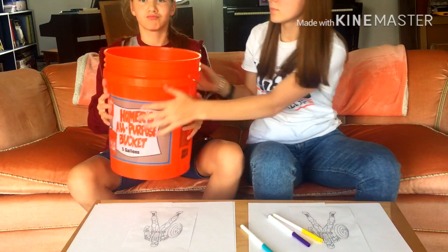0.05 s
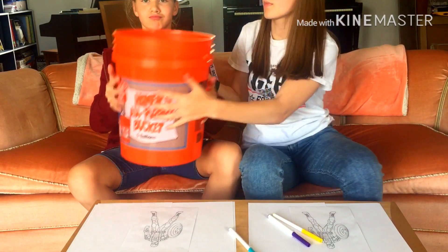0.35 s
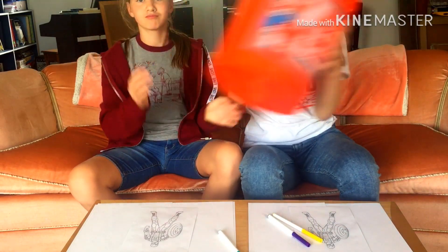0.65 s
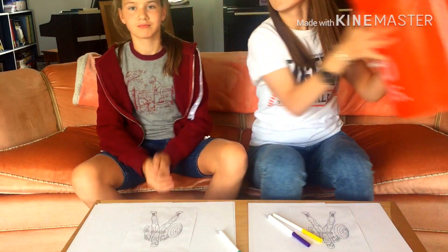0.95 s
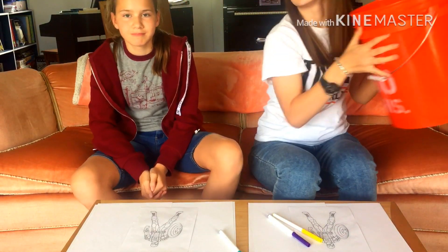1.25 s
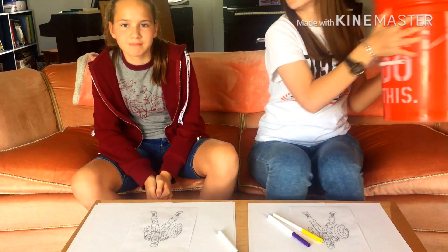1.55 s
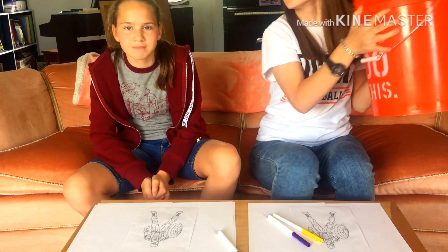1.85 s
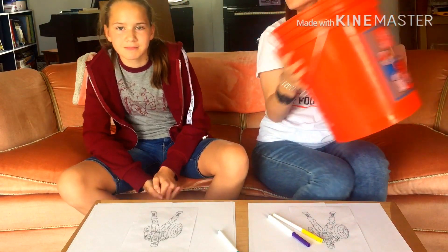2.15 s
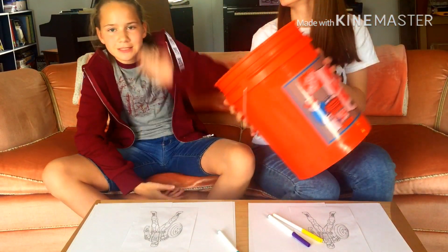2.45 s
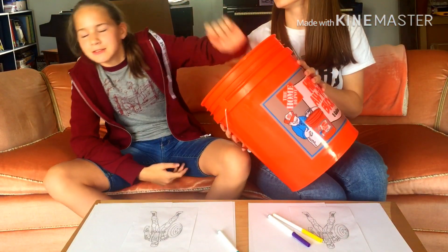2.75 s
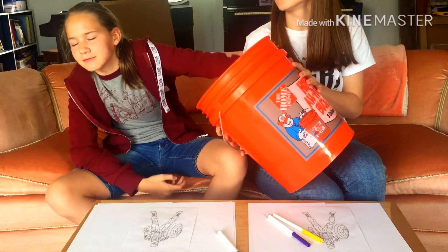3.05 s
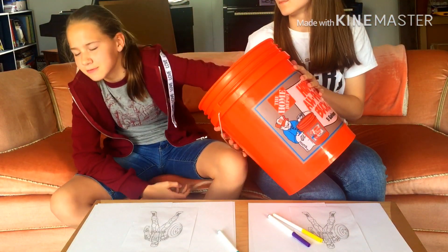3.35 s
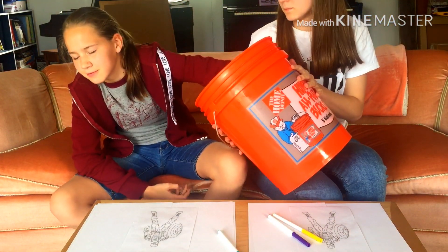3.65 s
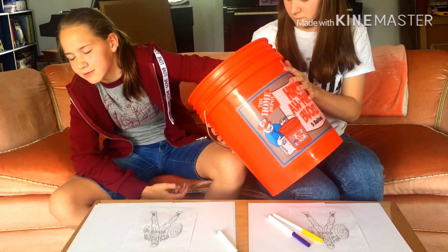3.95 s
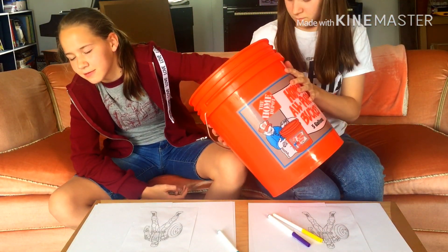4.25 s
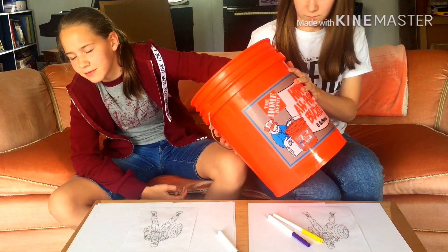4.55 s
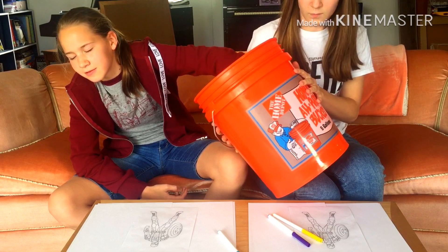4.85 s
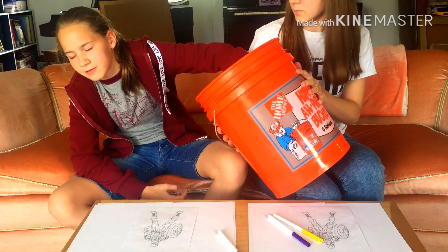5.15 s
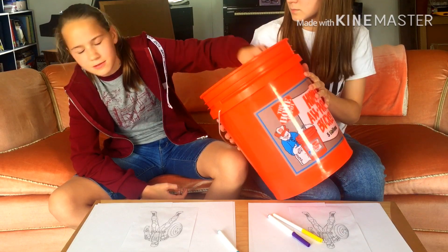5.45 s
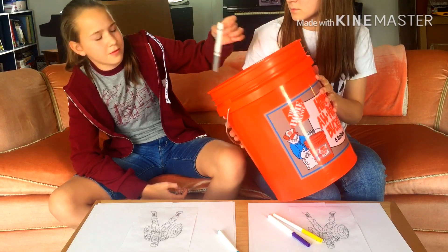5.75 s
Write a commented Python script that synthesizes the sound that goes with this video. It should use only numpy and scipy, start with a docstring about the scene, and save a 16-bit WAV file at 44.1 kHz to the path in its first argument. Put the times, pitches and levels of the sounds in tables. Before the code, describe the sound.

Close to a small microphone in a quiet living room, a big plastic bucket is swung about, sending a heap of markers sliding, rattling and drumming against its bottom. The shaking ends with a soft bump and a brief pause. Then a hand stirs through the markers in short pushes, with lighter shuffling and scattered sharp clacks, each ringing briefly in the hollow bucket.

```python
"""Felt-tip markers tumbling in a big plastic bucket, close to a small microphone in a quiet living room.
The bucket is shaken, handed over and set on a lap, then a hand rummages in it. Each collision is a dry
clack of the barrels; those that reach the bottom make it thump like a slack drum. The shell booms when
jolted, skin hisses over plastic, and the air in the bucket and the room ring on behind."""
import sys
import numpy as np
from scipy import signal
from scipy.fft import rfft, irfft
from scipy.io import wavfile
from scipy.ndimage import uniform_filter1d

SR = 44100
rng = np.random.default_rng(int(sys.argv[2]) if len(sys.argv) > 2 else 0)


def master_out(mix):
    """Clip the mix to full scale and print it as 16-bit PCM to the path in sys.argv[1]."""
    frames = np.transpose(np.atleast_2d(mix))
    ceiling = np.clip(frames, -1, 1)
    pcm = np.round(ceiling * 32767).astype(np.int16)
    wavfile.write(sys.argv[1], SR, pcm)


N = 261072
TIME = np.arange(N) / SR


def gain_of(db):
    """Decibels to amplitude."""
    return 10 ** (np.asarray(db) / 20)


def unit_rms(x):
    """Scales to rms 1."""
    return x / np.sqrt(np.mean(x ** 2) + 1e-20)


def unit_energy(x):
    """Scales each sound to energy 1."""
    return x / np.linalg.norm(x, axis=-1, keepdims=True)


def decay(t, t60):
    """Falls by 60 dB in t60 seconds."""
    return np.exp(-np.log(1000) * t / t60)


def read(points, hz):
    """Reads (frequency [Hz], value) points on a log-frequency axis."""
    f, value = np.transpose(points)
    return np.interp(np.log(hz + 1), np.log(f + 1), value)


def steep(x, hz, side, order=4):
    """Butterworth low-, band- or high-pass."""
    return signal.sosfilt(signal.butter(order, hz, side, fs=SR, output="sos"), x)


def add(mix, s, sound):
    """Mixes a sound in at s seconds."""
    part = mix[max(round(s * SR), 0):][:len(sound)]
    part += sound[:len(part)]


def movement(start_s, build_s, settle_s, db):
    """Gain of one movement: it builds to its peak, then settles to rest."""
    t = TIME - start_s
    ramp = np.minimum(t / build_s, 1 - (t - build_s) / settle_s)
    return gain_of(db) * np.maximum(ramp, 0) ** 1.003


def noise(spectrum):
    """Steady noise of rms 1, coloured by (frequency [Hz], level [dB]) points."""
    colour = gain_of(read(spectrum, np.fft.rfftfreq(N, 1 / SR)))
    return unit_rms(irfft(rfft(rng.standard_normal(N)) * colour, N))


def dying_noise(t60s, count, size):
    """Noise bursts of energy 1, each octave dying at its own speed."""
    hz, centres = np.fft.rfftfreq(size, 1 / SR), np.geomspace(200, 12800, 7)
    white, out = np.exp(2j * np.pi * rng.random((count, len(hz)))), 0
    for centre, share in zip(centres, np.eye(len(centres))):
        t60 = read(t60s, centre)
        band = irfft(white * read(np.c_[centres, share], hz), size)
        out = out + band * decay(TIME[:size], t60) / np.sqrt(t60)
    return unit_energy(out)


def cap_rings(count, size, modes=12):
    """The hollow barrel and its cap ring at high pitches, different for each marker."""
    t, (place, force) = TIME[:size], rng.random((2, count, modes, 1))
    hz = 1200 + 14000 * (np.arange(modes)[:, None] + place) / modes
    rings = force * np.sin(2 * np.pi * hz * t) * decay(t, t60=0.035)
    return unit_energy(rings.sum(axis=1))


# Colour of a clack close up: (frequency [Hz], level [dB])
CLACK_SPECTRUM = [(180, -5.5), (300, 4.5), (366, -1.5), (601, 4.5), (697, 1), (954, 4.5), (1160, 1),
                  (1310, 5), (1850, 0.5), (2110, 1), (3090, -10.5), (4900, -36.5), (5500, -32), (9490, -56),
                  (15600, -67)]
# Decay of a struck barrel: (frequency [Hz], t60 [s])
BARREL_DECAY = [(400, .03), (1500, .022), (4000, .012), (12000, .008)]
# Decay in the hollow of the bucket: (frequency [Hz], t60 [s])
HOLLOW_DECAY = [(200, 0.22), (1000, 0.31), (4000, 0.093), (12000, 0.49)]

def clacks(barrel_hz, bounce_db, cap_db, size=4096):
    """Plastic barrels strike and bounce: a clack per pitch, split into body, sharp edge and fine tick."""
    count, hz, t = len(barrel_hz), abs(np.fft.fftfreq(size, 1 / SR)), TIME[:size]
    octaves_off = np.log2((hz + 1) / barrel_hz[:, None])
    ring_db = 7 * np.exp(-(octaves_off / 0.24) ** 2)
    log_gain = np.log(gain_of(np.maximum(read(CLACK_SPECTRUM, hz) + ring_db, -80)))
    colour = np.fft.ifft(np.exp(np.conj(signal.hilbert(log_gain)))).real[:, :size // 2]  # minimum phase
    contact = dying_noise(BARREL_DECAY, count, size) + gain_of(cap_db) * cap_rings(count, size)
    contact *= 1 - np.exp(-t / 0.00066)
    # one end of a marker lands first, the other a few milliseconds later
    lags = (rng.uniform(0.001, 0.004, count) * SR).astype(int)
    far_ends = dying_noise(BARREL_DECAY, count, size)
    rebound = np.array([np.roll(burst, lag) for burst, lag in zip(far_ends, lags)])
    # every spot in the bucket has its own pattern of bounces between the walls
    bounces = dying_noise(HOLLOW_DECAY, count, size) * (1 - np.exp(-t / 0.0023))
    bursts = contact + gain_of(-3) * rebound + gain_of(bounce_db) * bounces
    bursts = signal.fftconvolve(bursts, colour, axes=1)[:, :size]
    body = steep(bursts, 3500, "low")
    edge = steep(bursts, [4200, 7400], "band")
    tick = steep(bursts, [8400, 15000], "band")
    return unit_energy(np.array([body, edge, tick]))


# Modes of the bucket's bottom: (multiple of its pitch, level [dB], t60 [s])
BOTTOM_MODES = [(.74, -18, 0.2), (1, 19.5, 0.11), (1.28, 6.5, 0.11), (1.95, -39, .03),
                (2.701, -15.5, 0.076)]

def thump(hz, rise_s=0.0013):
    """The struck bottom rings like a slack drum."""
    t = TIME[:5000]
    ring = sum(gain_of(db) * decay(t, t60) * np.sin(2 * np.pi * hz * ratio * t)
               for ratio, db, t60 in BOTTOM_MODES)
    return unit_energy(ring * (1 - np.exp(-t / rise_s)))


def collisions(sounds, per_s, spread_db, window=2200):
    """Random hits of unequal force, one track per band, each held near a steady power of 1."""
    hits = rng.random(N) < per_s / SR
    force = hits * gain_of(spread_db * np.clip(rng.standard_normal(N), -2, 2))
    # a few markers bounce again and again, then others take over
    active, turnover_per_s = 9, 45
    which = (rng.integers(0, active, N) + (TIME * turnover_per_s).astype(int)) % sounds.shape[1]
    out = np.zeros((len(sounds), N))
    for at in np.flatnonzero(force):
        for track, sound in zip(out, sounds[:, which[at]]):
            add(track, at / SR, force[at] * sound)
    power = uniform_filter1d(uniform_filter1d(out ** 2, window), window // 2)
    return out / np.sqrt(abs(power) + 0.0084 * power.mean(axis=1, keepdims=True))


def sliding_heap(slides, per_s, spread_db, bottom_hz, body_db, edge_db, tick_db, drum_db, brightening):
    """The heap clatters, brighter the harder it moves; the heavier hits drum on the bottom."""
    markers = clacks(rng.permutation(np.geomspace(700, 3600, 110)), bounce_db=-3, cap_db=-3)
    body, edge, tick = collisions(markers, per_s, spread_db)
    pitches = rng.permutation(np.geomspace(*bottom_hz, 12))
    thumps = np.array([(-1) ** k * thump(hz) for k, hz in enumerate(pitches)])
    drum, = collisions(thumps[None], per_s=140, spread_db=2, window=1500)
    powers = np.array([movement(*slide) ** 2 for *slide, _ in slides])
    motion = np.sqrt(powers.sum(axis=0))
    drumming = np.sqrt(gain_of([db for *_, db in slides]) ** 2 @ powers)
    treble = (gain_of(edge_db) * edge + gain_of(tick_db) * tick) * (motion / motion.max()) ** brightening
    return motion * (gain_of(body_db) * body + treble) + gain_of(drum_db) * drum * drumming


# Swings of the bucket: (start [s], build-up [s], settling [s], relative level [dB], drum offset [dB])
SWINGS = [(0.0, 0.0069, 0.17, -23, -0.5), (0.085, 0.029, 0.15, -20, -22), (0.14, 0.052, .15, -18, 0),
          (0.24, 0.047, 0.34, -23, -4), (0.59, 0.078, 0.15, -37.5, -4.5), (0.72, 0.07, 0.2, -32.5, -1),
          (0.91, .2, 0.4, -19, 1.5), (1.36, 0.075, 0.27, -28, -3), (1.43, 0.17, .15, -23, 3),
          (1.65, 0.15, .15, -19.5, -17), (1.83, 0.095, 0.36, -22, 0.5), (2.26, 0.13, 0.25, -29, 5.5),
          (2.39, 0.21, 0.17, -24, -6), (2.77, 0.013, 0.12, -40, -9)]

def shaking():
    """Each swing of the bucket sends the heap sliding and rolling."""
    return sliding_heap(SWINGS, per_s=440, spread_db=0.35, bottom_hz=(192.7, 224.5),
                        body_db=-3.5, edge_db=-15.5, tick_db=-25, drum_db=-4, brightening=0.48)


# Standing waves inside the bucket: (frequency [Hz], t60 [s], level at resonance [dB])
AIR_MODES = [(201, 0.68, 0), (484.5, 0.021, -1), (555, 0.3, 2), (972, 0.07, -1.5), (1176, 0.17, -30),
             (1628, 0.028, -8), (2020, 0.13, -11), (3242, 0.004, 4)]

def bucket_air(x):
    """The air in the bucket rings on; the bucket is too small to radiate deep bass."""
    t = TIME[:8000]
    waves = sum(gain_of(db) * 2 * np.log(1000) / (t60 * SR) * decay(t, t60) * np.cos(2 * np.pi * hz * t)
                for hz, t60, db in AIR_MODES)
    return steep(x + signal.oaconvolve(x, waves)[:N], 122, "high", order=6)


# Reverberation of the living room: (frequency [Hz], t60 [s])
ROOM_DECAY = [(200, 0.33), (1000, 0.24), (4000, 0.15), (12000, 0.028)]

def living_room(x, wet_db=-11, delay_s=0.007, moves_per_s=3):
    """A short tail behind the close sound; its pattern shifts as the bucket and the people move."""
    out = x.copy()
    for k, tail in enumerate(dying_noise(ROOM_DECAY, count=3, size=24000)):
        share = np.sqrt(2 / 3) * np.cos(np.pi * (moves_per_s * TIME + k / 3))
        add(out, delay_s, gain_of(wet_db) * signal.oaconvolve(x * share, tail))
    return out


# The still room at the microphone: (frequency [Hz], relative level [dB])
ROOM_TONE_SPECTRUM = [(18, -30.5), (30, -2), (75, -6), (108, -12), (243, -8), (456, -16.5), (533, -21.5),
                      (900, -17), (1140, -20.5), (2030, -19), (4800, -28.5), (6570, -31), (10300, -37),
                      (12000, -34), (15600, -45.5)]

def room_tone():
    """A faint, steady rumble and hiss all around."""
    return gain_of(-60.5) * noise(ROOM_TONE_SPECTRUM)


def blows(rows, bounce_db, body_db, edge_db, tick_db, thump_db):
    """Markers hit the wall, the bottom or each other; a hard contact lifts the finest ticks most."""
    out = np.zeros(N)
    times, clack_db, bright_db, barrel_hz, bottom_db, bottom_hz = np.transpose(rows)
    body, edge, tick = clacks(barrel_hz, bounce_db, cap_db=-5)
    for k, s in enumerate(times):
        treble = gain_of(edge_db + bright_db[k] / 2) * edge[k] + gain_of(tick_db + bright_db[k]) * tick[k]
        add(out, s, gain_of(clack_db[k]) * (gain_of(body_db) * body[k] + treble))
        add(out, s, gain_of(bottom_db[k] + thump_db) * thump(bottom_hz[k]))
    return out


# Bunches landing, levels relative:
# (time [s], clack [dB], brightness [dB], barrel pitch [Hz], thump [dB], bottom pitch [Hz])
CRASHES = [(0.002, -7, 2.5, 970, -27.5, 292), (0.169, -8, -2, 950, -17, 169),
           (0.196, -5, 3, 1190, -9.5, 196), (0.286, -8, -1, 940, -39, 208),
           (0.357, -12, 2.5, 960, -15.5, 205), (1.007, -11, -4, 970, -26, 200),
           (1.125, -5, 2.5, 850, -30, 218), (1.192, -11, 1, 1620, -18.5, 196),
           (1.309, -14.5, 3, 960, -15, 207.4), (1.57, -13, 6.5, 960, -26.5, 255),
           (1.8, -8.5, 8.5, 960, -13, 243), (1.918, -10.5, 1, 1060, -19.5, 239),
           (2.476, -23, 1, 960, -16, 239), (2.594, -14, 6.5, 876, -24.5, 253),
           (3.433, -17, -2, 940, -18, 241), (3.474, -13.5, 0.5, 634, -20, 277),
           (3.521, -22, 6.5, 880, -34, 267), (3.835, -16.5, -15, 2064, -30, 192),
           (3.865, -18.5, 5, 760, -24.5, 155), (4.426, -16, 4.5, 565, -24, 189.8),
           (4.445, -14.5, -7, 975, -18.5, 185), (4.466, -16.5, -6, 560, -21, 189),
           (4.544, -19, -6, 1010, -27.5, 157), (4.69, -15.5, -5, 1360, -26.5, 190),
           (4.75, -15, -10, 1010, -34, 189), (5.254, -20.5, -12, 880, -21, 176),
           (5.42, -27, 1.5, 750, -31.5, 262)]

def crashes():
    """A bunch of markers comes down together; strong bounces smear the clack into a short crash."""
    return blows(CRASHES, bounce_db=5, body_db=17.5, edge_db=-0.5, tick_db=-6.5, thump_db=25.5)


# Single markers landing, levels relative:
# (time [s], clack [dB], brightness [dB], barrel pitch [Hz], thump [dB], bottom pitch [Hz])
SINGLE_KNOCKS = [(0.093, -12.5, 3.5, 1520, -50, 318), (0.272, -15, -8, 993, -31, 203),
                 (0.495, -19, 4, 1960, -57, 200), (0.605, -29, 2, 1440, -53, 197),
                 (0.618, -20.5, -6, 1420, -68, 319.3), (0.813, -22, -3, 870, -49, 201),
                 (0.928, -25.5, 10, 2180, -29.5, 213), (0.969, -20.5, 13.5, 2110, -24.5, 201),
                 (1.041, -14, 13, 945, -19, 222), (1.284, -16.5, 10, 604, -13.5, 189),
                 (1.391, -16.5, -6, 930, -23, 232), (1.66, -9, 7.5, 1980, -24, 207),
                 (2.125, -27, 6, 950, -18, 230), (2.195, -11, 2, 890, -25, 184),
                 (2.341, -17.5, 6, 840, -28, 252), (2.735, -22.5, 6.5, 2730, -75, 181),
                 (2.806, -29.5, 8, 1460, -70, 199), (3.102, -47.5, 4.5, 970, -58, 329),
                 (3.323, -32, -12, 720, -33, 232), (3.358, -28, 5, 610, -28.5, 230),
                 (3.4, -33, -12, 603, -19, 225), (3.646, -24, 4, 964.4, -27, 194),
                 (3.706, -32, 15, 960.5, -17.5, 188), (3.739, -22, -10, 980, -20, 191),
                 (3.938, -25.5, 1, 1570, -36, 151), (4.323, -25, -7, 1910, -62, 284),
                 (4.585, -21, -2, 2320, -41, 199), (4.611, -17.5, -2, 970, -31, 149),
                 (4.666, -12, -1, 576, -31, 190), (4.856, -20, 1, 544, -25.5, 238),
                 (4.969, -24, 6, 960, -33, 205), (4.98, -14.5, 13.5, 1020, -49, 223),
                 (4.998, -12, -6, 950, -43, 256), (5.038, -16, -2, 1470, -54, 210),
                 (5.161, -15, -1.5, 630, -22.5, 199), (5.318, -16, 2.5, 576, -29.5, 158),
                 (5.495, -20, 4, 1020, -16.5, 204), (5.522, -9.5, 5.5, 586, -14.5, 249),
                 (5.581, -19.5, -10, 1270, -18, 186), (5.626, -24.5, -24, 622, -25.5, 207)]

def knocks():
    """One marker strikes with a dry clack and weaker bounces."""
    return blows(SINGLE_KNOCKS, bounce_db=-1.5, body_db=17, edge_db=0, tick_db=-13.5, thump_db=24.5)


# Booms of the shell: (time [s], pitch [Hz], level [dB], t60 [s])
SHELL_BOOMS = [(0.195, 137, -16, 0.13), (2.427, 109, -24.5, 0.042), (2.456, 54, -35, 0.24),
               (4.453, 139, -36, 0.091)]

def shell_flex(rise_s=0.012):
    """The whole bucket flexes with a low, soft boom as it is jolted or set on the knees."""
    out, t = np.zeros(N), TIME[:16000]
    for s, hz, db, t60 in SHELL_BOOMS:
        swell = (1 - np.exp(-t / rise_s)) ** 2 * decay(t, t60)
        add(out, s, gain_of(db) * swell / swell.max() * np.sin(2 * np.pi * hz * t))
    return out


# Hand strokes on the markers and the wall: (start [s], build-up [s], release [s], relative level [dB])
HAND_STROKES = [(1.323, .006, 0.036, -44), (3.61, 0.22, 0.091, -50), (4.001, 0.013, 0.25, -49.5),
                (4.26, .025, 0.049, -53), (4.405, 0.027, 0.063, -43), (5.31, 0.031, 0.068, -49)]

def hand_brush(grain_db=3):
    """Skin slides over plastic in tiny slips: a thin, grainy hiss."""
    slips = gain_of(grain_db * unit_rms(uniform_filter1d(rng.standard_normal(N), 130)))
    hiss = noise([(2000, -30.5), (7000, -2), (9600, 8.5), (10600, -13), (12400, 5), (16000, -23)])
    return gain_of(-4) * unit_rms(slips * hiss) * sum(movement(*stroke) for stroke in HAND_STROKES)


# The bucket landing on the lap: (start [s], build-up [s], settling [s], level [dB])
LAP_LANDING = [(2.43, .058, 0.051, -34)]

def lap_rub():
    """A soft, low rubbing as the bucket settles on the knees."""
    rub = noise([(20, -23), (38, -8), (55, -1), (100, -21), (160, 3), (500, -70.5)])
    return rub * sum(movement(*bump) for bump in LAP_LANDING)


# Pushes of the hand: (start [s], build-up [s], settling [s], relative level [dB], drum offset [dB])
HAND_PUSHES = [(3.39, 0.067, 0.23, -33.5, 4.5), (3.63, 0.15, 0.21, -32.5, 3),
               (3.8, 0.14, 0.23, -33.5, -10.5), (3.94, 0.25, 0.19, -33.5, -4), (4.39, 0.03, 0.19, -32.5, 2),
               (4.58, 0.13, 0.29, -36, 3), (4.96, 0.059, 0.18, -37, 3.5), (5.16, 0.091, 0.1, -40.5, 10.5),
               (5.31, 0.038, 0.2, -40, 0), (5.5, 0.05, 0.21, -39, 4.5)]

def rummaging():
    """Each push of the searching hand shifts the heap."""
    return sliding_heap(HAND_PUSHES, per_s=330, spread_db=0.5, bottom_hz=(166.4, 285),
                        body_db=0, edge_db=-15.5, tick_db=-29.5, drum_db=0.5, brightening=0.2)


def scene():
    """The bucket close by and the quiet room behind it, in mono."""
    inside = knocks() + crashes() + shaking() + rummaging() + hand_brush()
    markers = living_room(bucket_air(inside))
    return (markers + shell_flex() + lap_rub() + room_tone())[None]


def record(dry):
    """A small microphone: little deep bass, clipping at full scale, no extreme treble."""
    thin = steep(dry, 36, "high")
    band_limit = signal.firwin(511, 15800, window=("kaiser", 9), fs=SR)
    return signal.oaconvolve(np.clip(thin, -1, 1), band_limit[None], "same")


dry = scene()
out = record(dry)
master_out(out)
```